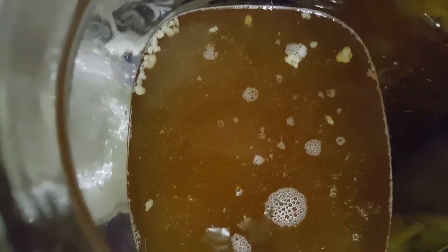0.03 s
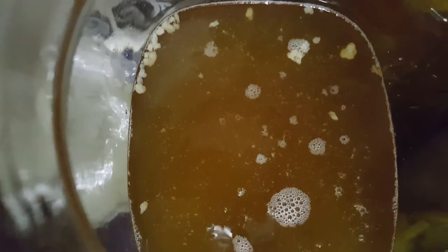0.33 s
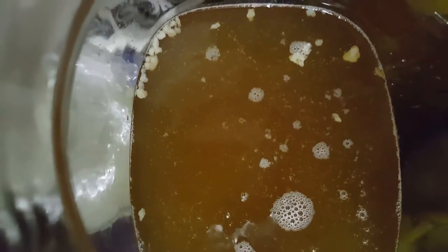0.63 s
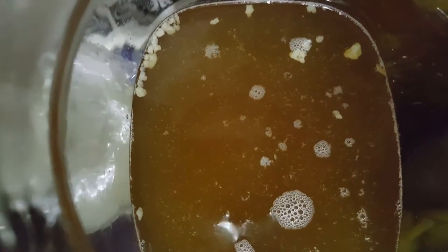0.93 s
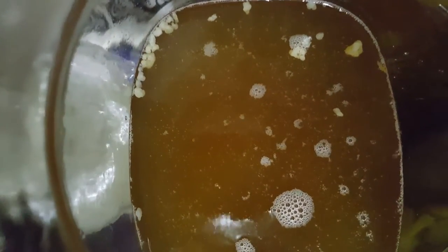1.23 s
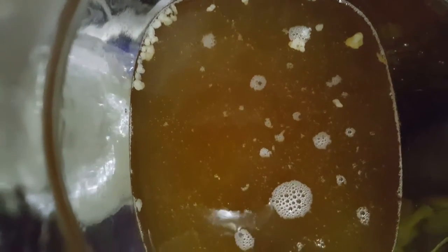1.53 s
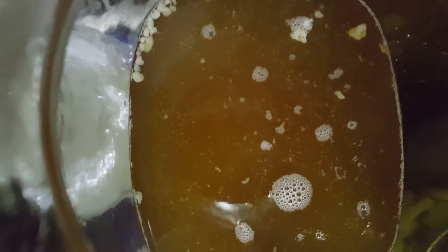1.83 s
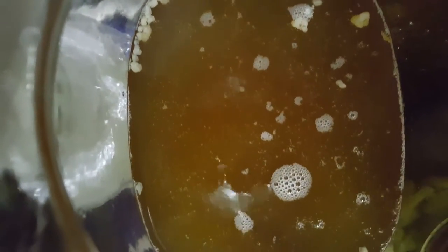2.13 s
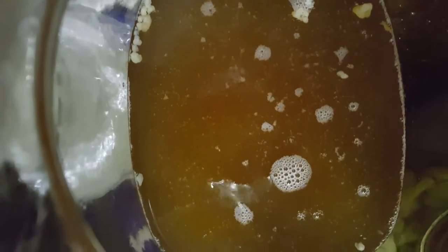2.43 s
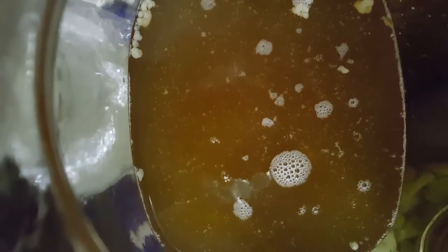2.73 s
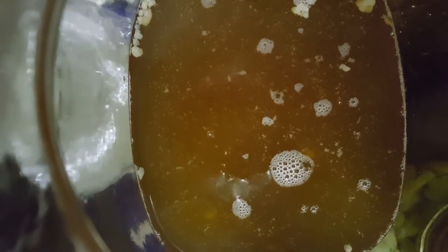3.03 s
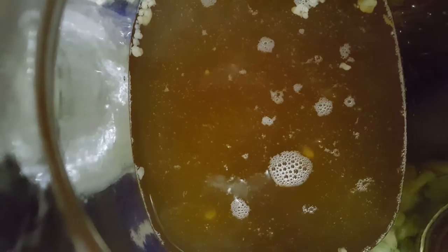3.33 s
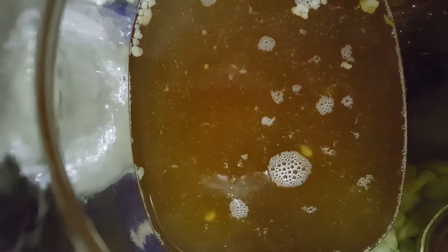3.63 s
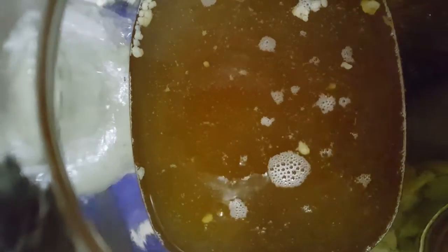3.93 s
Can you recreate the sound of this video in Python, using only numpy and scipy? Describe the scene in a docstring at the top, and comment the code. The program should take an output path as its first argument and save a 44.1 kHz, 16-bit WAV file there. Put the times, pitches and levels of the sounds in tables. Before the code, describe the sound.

Foam on a jar of fermenting liquid crackles faintly, very close, over a quiet room's hum and hiss. A few tiny bubbles ping, then two clusters of dry crackles come with soft handling bumps, mostly on the left.

```python
"""A mains hum, a steady hiss and a faint fine crackle fill a quiet room; very close, a jar of liquid ferments.
Handling adds finger scuffs and low hollow bumps, later dull knocks and short rubs.
A few tiny bubbles ping, rising in pitch. Dry crackles, from bursting foam or the grip, come singly
and in two clusters at the left microphone. Crackles and knocks faintly ring the recorder's case."""
import sys
import numpy as np
from scipy import signal
from scipy.fft import rfft, irfft, next_fast_len
from scipy.io import wavfile
from scipy.ndimage import map_coordinates

SR = 44100
rng = np.random.default_rng(int(sys.argv[2]) if len(sys.argv) > 2 else 0)


def master_out(mix):
    """Clip the mix to full scale and print it as 16-bit PCM to the path in sys.argv[1]."""
    frames = np.transpose(np.atleast_2d(mix))
    ceiling = np.clip(frames, -1, 1)
    pcm = np.round(ceiling * 32767).astype(np.int16)
    wavfile.write(sys.argv[1], SR, pcm)


N = 176400

# Pan is left minus right throughout.
# Hum lines. Each row: frequency in Hz, rms level in dB, pan in dB, unsteadiness from 0 to 1.
HUM_LINES = [(100.45, -48.5, -1, 0.15), (121, -56.5, 0, 0.69), (200.7, -56.5, 0, 0.25),
             (236.7, -61, 6.5, 0.99), (459.7, -69, 38, 0.26), (908, -79, -12, 0.49)]
# Spectra. Each row: frequency in Hz, relative level in dB.
RUMBLE_SPECTRUM = [(25, -14), (55, -3), (80, 3), (160, 5.5), (250, -1), (380, -20), (700, -40.5),
                   (3000, -49)]
HISS_LEFT_SPECTRUM = [(60, -12), (290, 20), (380, 12.5), (500, 12), (900, 3.5), (2400, -4.5), (4300, -6),
                      (7300, -5), (8450, -0.5), (9700, -10.5), (11000, -12), (12800, -7.5), (16000, -9)]
HISS_RIGHT_SPECTRUM = [(300, 15.5), (900, 6), (1600, 0.5), (3700, -2), (4600, -6.5), (8300, -7.5),
                       (10000, -12.5), (15000, -7)]
CRACKLE_SPECTRUM = [(600, -22), (1200, -16), (1800, -12), (2700, -8), (3700, -13.5), (6700, -7), (8250, 1),
                    (8900, -3), (9600, -13.5), (13000, -9), (16000, -14.5)]
KNOCK_SPECTRUM = [(60, 4), (250, 6.5), (1000, -2.5), (2200, -15), (3500, -23), (16000, -32)]
RUB_SPECTRUM = [(100, -5), (350, 8), (680, 2.5), (900, -7), (2700, -9), (3800, -15), (8200, -22),
                (16000, -31)]
# Case resonances. Each row: frequency in Hz, relative level in dB, T60 in seconds.
CASE_MODES = [(630, -18, 0.19), (1618, 0, 0.087), (1979, 2, 0.082), (2165, 2.5, 0.027), (2635, 3.5, 0.065)]
# Treble of the left hiss. Each row: time in seconds, gain in dB.
TREBLE_GAIN = [(0, 2.5), (1.3, 3), (2.1, 4), (2.45, -2.5), (3.0, 2), (3.6, -4.5), (4, -1)]
# Thin hisses. Each row: start and end in seconds, centre in Hz, half-width in octaves,
# level and pan in dB.
SIZZLES = [(0, 1.164, 3100, 0.33, -69, -37), (0.976, 0.989, 4450, 0.56, -67, 3),
           (1.892, 1.925, 4800, 0.75, -61.5, 21), (3.77, 4, 2050, 0.44, -70, 10)]
# Finger scuffs. Each row: start in seconds, gain and pan in dB, T60 in seconds, extra treble in dB.
SCUFFS = [(0.038, -21, 0, 0.024, -1), (0.076, -19, -2, 0.026, 1), (1.159, -16.5, -22, 0.023, 9.5),
          (3.769, -19, -0.5, 0.05, -6)]
# Hollow bumps. Each row: start in seconds, pitch in Hz, level in dB, T60 in seconds.
BUMPS = [(0.371, 299, -44.5, 0.24), (2.3694, 238.6, -26, 0.081), (3.255, 145, -33, 0.11),
         (3.3065, 209, -27.5, 0.0375), (3.321, 202, -25.5, 0.041), (3.347, 205, -25, 0.024),
         (3.413, 55, -38, 0.059)]
# Bubbles. Each row: start in seconds, pitch in Hz, level in dB, T60 in seconds,
# rise in octaves per second.
BUBBLES = [(0.468, 8170, -41.5, 0.058, 0.36), (1.887, 7750, -41.5, 0.052, 0.09),
           (1.899, 3290, -47.5, 0.13, .1)]
# Distinct crackles. Each row: start in seconds, then gain, extra body and extra top in dB.
CRACKLES = [(1.3133, -26, -2, 5), (1.634, -30, 10, -7), (1.683, -28, -4, 4), (1.8146, -24, -2, 2),
            (1.906, -18.5, -2, 7), (2.0275, -15.5, -1.5, -13), (2.0321, -20.5, -1, 1), (2.036, -25, -8, 7),
            (2.152, -18.5, 5, -1), (2.2007, 0, 7, -9), (2.206, -14, -8, -2), (2.2131, -9.5, 3, 1),
            (2.2165, -5.5, 4, -7), (2.2227, -15, 10, -7), (2.2474, -14, -3, -2), (2.4111, -21.5, 3.5, -15),
            (2.588, -20, 5.5, 4), (2.6435, -8.5, -6, -9), (2.6541, -19, 4, -2), (2.8241, -26, 2, 3),
            (2.9475, -24, -7, 0), (2.9896, -14.5, -1, 3.5), (3.013, -24, 6, 0), (3.106, -17.5, 15, -1),
            (3.1352, -14.5, -41, -7), (3.1916, -22.5, 5, -3), (3.2158, -19, 0, -3), (3.2357, -10, 2.5, -2),
            (3.2482, -19, 3, -7), (3.2511, -17, 6, 3), (3.277, -21, 3, -9), (3.2989, -2, 0, -11),
            (3.3035, -10, 1, -2), (3.3064, -10.5, 3, -16), (3.3203, -16, 4, 6), (3.3222, -11.5, 1, 4.5),
            (3.3285, -28, -1, 0), (3.354, -19, 5, -9), (3.3706, -22, 10, 0), (3.9044, -27, 14.5, 3)]
# Knocks. Each row: start in seconds, gain in dB, pan in dB.
KNOCKS = [(2.104, -14.5, 25), (2.2008, -15.5, 24), (2.2058, -11, 19), (2.2145, -10, 25), (2.781, -8, -35)]
# Shifts of the grip. Each row: centre in seconds, Gaussian width in seconds, level in dB.
GRIP_SHIFTS = [(2.222, 0.011, -55), (2.605, 0.032, -60), (3.245, 0.033, -50.5), (3.319, 0.016, -44.5),
               (3.396, 0.036, -55)]
# Crackles and rubs at the right microphone. Each row: frequency in Hz, loss in dB.
FAR_SIDE_LOSS = [(200, 16), (3000, 21), (8000, 26), (12000, 18)]

TOP_HZ = 16100


def amp(db):
    """Decibels to gain."""
    return 10 ** (np.asarray(db) / 20)


def unit(x):
    """Scale to rms 1."""
    return x / np.sqrt(np.mean(x ** 2) + 1e-20)


def along(points, hz):
    """Interpolate (Hz, value) points on a log axis."""
    f, v = np.transpose(points)
    return np.interp(np.log(hz + 1), np.log(f + 1), v)


def curve(rows):
    """Interpolate (seconds, value) points per sample."""
    return np.interp(np.arange(N) / SR, *np.transpose(rows))


def wobble(knots_per_s):
    """Smooth random curve."""
    knots = rng.standard_normal(N // 100)
    return map_coordinates(knots, [np.arange(N) * knots_per_s / SR], mode="wrap")


def filtered(x, response):
    """Apply the gain response(Hz)."""
    size = next_fast_len(N + SR // 2)
    return irfft(rfft(x, size) * response(np.fft.rfftfreq(size, 1 / SR)), size)[..., :N]


def noise(spectrum):
    """Coloured noise, rms 1."""
    return unit(filtered(rng.standard_normal(N), lambda hz: amp(along(spectrum, hz))))


def snap(colour_db, size=2048):
    """Minimum-phase impulse with spectrum colour_db(Hz)."""
    cepstrum = irfft(np.log(amp(colour_db(np.fft.rfftfreq(size, 1 / SR)))))
    cepstrum[1:size // 2] *= 2
    cepstrum[size // 2 + 1:] = 0
    return irfft(np.exp(rfft(cepstrum)))


def panned(x, pan_db):
    """Stereo, far side turned down."""
    return amp([[min(pan_db, 0)], [min(-pan_db, 0)]]) * x


def add(track, start_s, sound):
    """Mix a sound into a track."""
    part = track[..., max(round(start_s * SR), 0):][..., :sound.shape[-1]]
    part += sound[..., :part.shape[-1]]


def hum(rumble_db=-55.5):
    """An appliance's mains and motor lines waver over room rumble."""
    t = np.arange(N) / SR
    out = panned(amp(rumble_db) * noise(RUMBLE_SPECTRUM), 0)
    for hz, db, pan_db, unsteady in HUM_LINES:
        sway = 1 - unsteady + unsteady * (wobble(7) + 1j * wobble(7)) / 2
        tone = np.real(sway * np.exp(2j * np.pi * (hz * t + rng.random())))
        out += panned(amp(db) * unit(tone), pan_db)
    return out


def case_response(hz):
    """Direct path plus the case's resonances."""
    return 1 + 1.1 * sum(amp(db) / (1 + 2j * np.pi * (hz - mode_hz) * t60_s / np.log(1000))
                         for mode_hz, db, t60_s in CASE_MODES)


def hiss(left_db=-60, right_db=-62.5, split_hz=4400, flutter_db=1.2):
    """Separate hiss per side. The case colours the left, whose treble flutters and dips twice."""
    left = amp(left_db) * filtered(noise(HISS_LEFT_SPECTRUM), case_response)
    treble = filtered(left, lambda hz: hz ** 2 / (hz ** 2 + split_hz ** 2))
    treble_db = curve(TREBLE_GAIN) + flutter_db * wobble(50)
    left += treble * (amp(treble_db) - 1)
    return np.array([left, amp(right_db) * noise(HISS_RIGHT_SPECTRUM)])


def sizzles(fade_s=0.01):
    """Faint noise bands, short or sustained."""
    out, t = np.zeros((2, N)), np.arange(N) / SR
    for start_s, end_s, centre_hz, width_oct, db, pan_db in SIZZLES:
        white = rng.standard_normal(N)
        band = filtered(white, lambda hz: 1 / (1 + (np.log2((hz + 1) / centre_hz) / width_oct) ** 2))
        gate = np.clip(1 + np.minimum(t - start_s, end_s - t) / fade_s, 0, 1)
        out += panned(amp(db) * gate * unit(band), pan_db)
    return out


def crack(colour_db, size=512, smear_s=0.0007, ripple_db=1.5):
    """One snap with random spectral ripple, its frequencies arriving slightly apart."""
    bins = [np.linspace(0, 15, size // 2 + 1)]
    ripple = map_coordinates(rng.standard_normal(16), bins, mode="nearest")
    lag = map_coordinates(rng.standard_normal(16), bins, mode="nearest")
    delay_s = smear_s * np.abs(lag) / 2
    phase = -2 * np.pi * np.cumsum(delay_s) * SR / size
    return irfft(rfft(snap(colour_db), size) * amp(ripple_db * ripple) * np.exp(1j * phase))


def grip():
    """Rubbing strength: one smooth swell per shift of the grip."""
    t = np.arange(N) / SR
    return sum(amp(db) * np.exp(-.5 * ((t - centre_s) / width_s) ** 2)
               for centre_s, width_s, db in GRIP_SHIFTS)


def fine_crackle(rest_per_s=90, rest_db=-40, grip_gain_db=16, spread_db=7, tilt_spread_db=5):
    """Tiny random snaps, dull to bright, louder and denser as the grip shifts."""
    out, effort = np.zeros(N), grip()
    level = amp(rest_db) + amp(grip_gain_db) * effort
    rate_per_s = rest_per_s * (1 + 2 * effort / effort.max())
    hits = rng.random(N) < rate_per_s / SR
    offset_db = spread_db * (2 * rng.random(N) - 1)
    shapes = [crack(lambda hz: along(CRACKLE_SPECTRUM, hz) + tilt_db * (2 * hz / TOP_HZ - 1))
              for tilt_db in tilt_spread_db * rng.standard_normal(20)]
    for i in np.flatnonzero(hits):
        add(out, i / SR, level[i] * amp(offset_db[i]) * shapes[i % len(shapes)])
    return out


def scuffs():
    """A finger drags: a dull pulse spread over a brief noise decay."""
    out, t = np.zeros((2, N)), np.arange(SR // 5) / SR
    for start_s, db, pan_db, t60_s, treble_db in SCUFFS:
        drag = rng.standard_normal(len(t)) * amp(-60 * t / t60_s)
        drag /= np.linalg.norm(drag)
        shelf = [(1500, 0), (3500, treble_db)]
        touch = snap(lambda hz: db + along(KNOCK_SPECTRUM, hz) + along(shelf, hz))
        add(out, start_s, panned(signal.fftconvolve(touch, drag), pan_db))
    return out


def bumps(attack_s=0.002, pan_db=16):
    """Hollow handling bumps, one low damped mode each."""
    out, t = np.zeros(N), np.arange(SR // 5) / SR
    for start_s, hz, db, t60_s in BUMPS:
        envelope = amp(db - 60 * t / t60_s) * (1 - np.exp(-t / attack_s))
        add(out, start_s, envelope * np.sin(2 * np.pi * hz * t))
    return panned(out, pan_db)


def bubbles(attack_s=0.0033, jitter_rad=0.075, pan_db=25):
    """Each tiny bubble rings and rises in pitch."""
    out, t = np.zeros(N), np.arange(SR // 6) / SR
    for start_s, hz, db, t60_s, rise_oct_per_s in BUBBLES:
        pitch_hz = hz * 2 ** np.minimum(rise_oct_per_s * t, .5)
        phase = np.cumsum(2 * np.pi * pitch_hz / SR + jitter_rad * rng.standard_normal(len(t)))
        envelope = amp(db - 60 * t / t60_s) * (1 - np.exp(-t / attack_s))
        add(out, start_s, envelope * np.sin(phase))
    return panned(out, pan_db)


def case_ring(t):
    """The case's modes, struck once."""
    return sum(amp(db - 60 * t / t60_s) * np.sin(2 * np.pi * hz * t) for hz, db, t60_s in CASE_MODES)


def crackles(scatter_db=-41, scatter_t60_s=0.045, case_db=-45.5):
    """Foam or grip snaps, ringing near 8 kHz, with short reflections and a faint case ring."""
    out, t = np.zeros(N), np.arange(SR // 10) / SR
    ring = amp(case_db) * case_ring(t)
    for start_s, db, body_db, top_db in CRACKLES:
        tilt = [(1500, body_db / 2), (4500, body_db), (7300, 0), (9000, 0), (10800, top_db)]
        click = crack(lambda hz: db + along(CRACKLE_SPECTRUM, hz) + along(tilt, hz))
        scatter = amp(scatter_db - 60 * t / scatter_t60_s) * rng.standard_normal(len(t))
        add(out, start_s, click)
        add(out, start_s, signal.fftconvolve(click, scatter + ring))
    return out


def knocks(case_db=-38):
    """Dull handling pulses; the case rings on the left only."""
    out, t = np.zeros((2, N)), np.arange(SR // 5) / SR
    pulse = snap(lambda hz: along(KNOCK_SPECTRUM, hz))
    ring = amp(case_db) * signal.fftconvolve(pulse, case_ring(t))
    knock = np.array([ring, np.zeros_like(ring)])
    add(knock, 0, pulse)
    for start_s, db, pan_db in KNOCKS:
        add(out, start_s, panned(amp(db) * knock, pan_db))
    return out


def rubs(grain_db=5, grains_per_s=250):
    """Short grainy swells of friction as the grip shifts."""
    return grip() * unit(noise(RUB_SPECTRUM) * amp(grain_db * wobble(grains_per_s)))


def scene():
    """Stereo mix. Crackles and rubs sit at the left microphone and barely reach the right."""
    near = crackles() + fine_crackle() + rubs()
    far = filtered(near, lambda hz: amp(-along(FAR_SIDE_LOSS, hz)))
    return np.array([near, far]) + bubbles() + scuffs() + bumps() + knocks() + hum() + hiss() + sizzles()


def record(dry):
    """Steep low-pass at TOP_HZ."""
    return filtered(dry, lambda hz: 1 / np.sqrt(1 + (hz / TOP_HZ) ** 200))


dry = scene()
out = record(dry)
master_out(out)
```